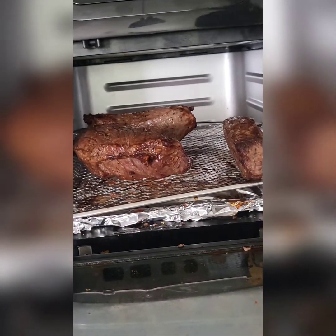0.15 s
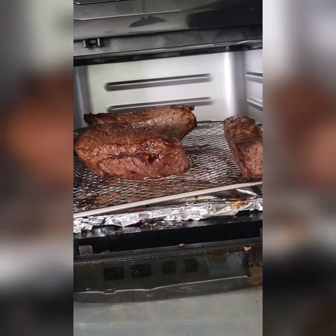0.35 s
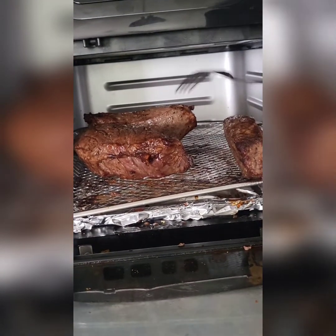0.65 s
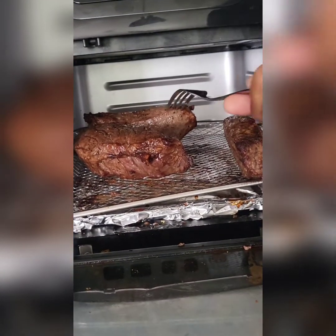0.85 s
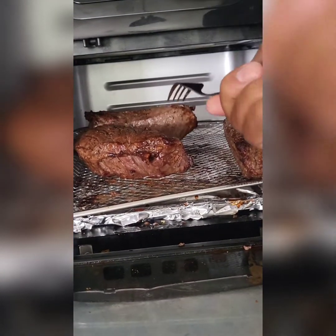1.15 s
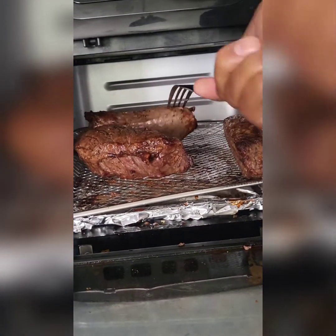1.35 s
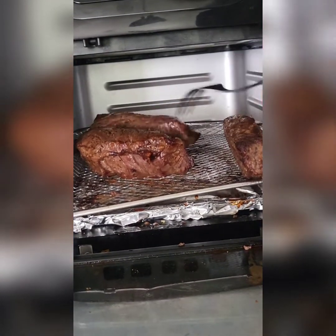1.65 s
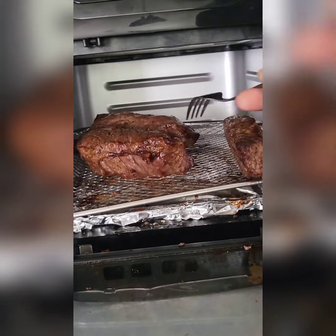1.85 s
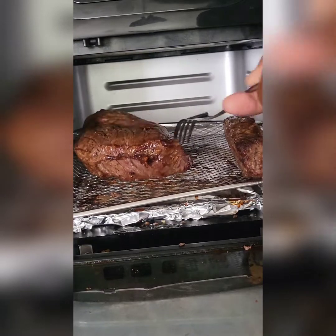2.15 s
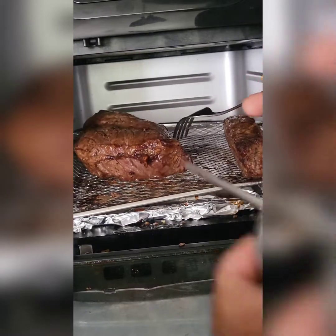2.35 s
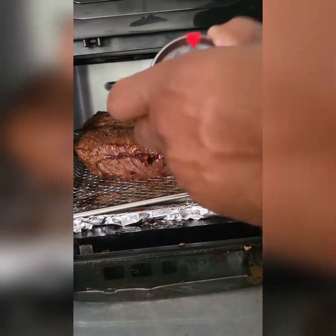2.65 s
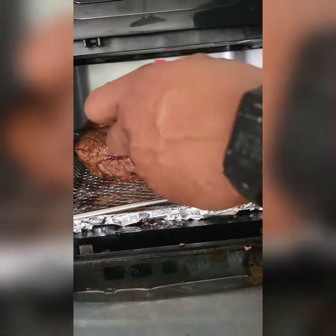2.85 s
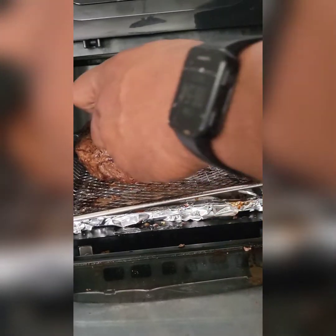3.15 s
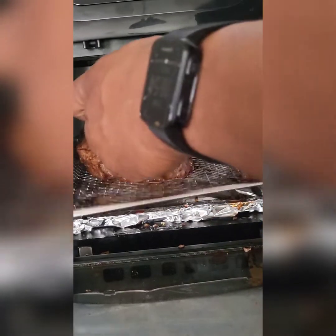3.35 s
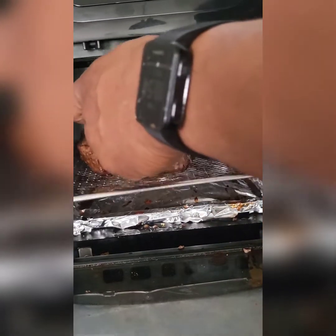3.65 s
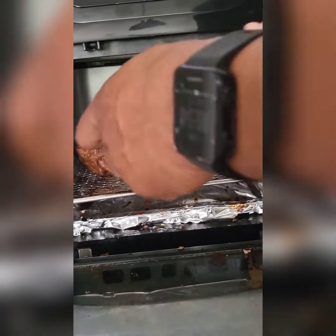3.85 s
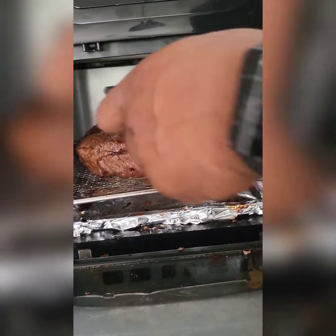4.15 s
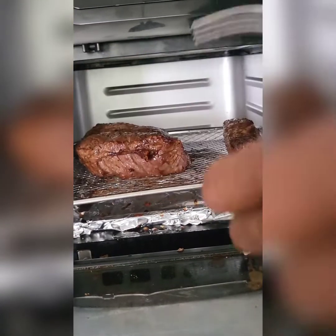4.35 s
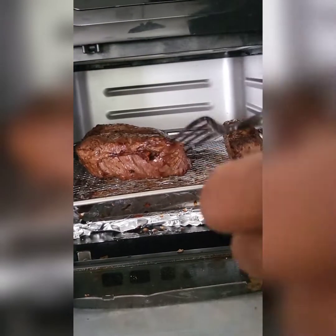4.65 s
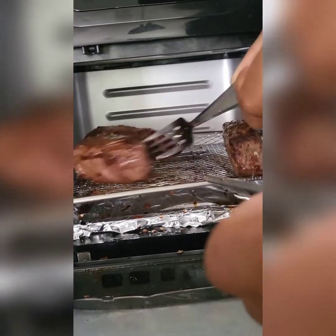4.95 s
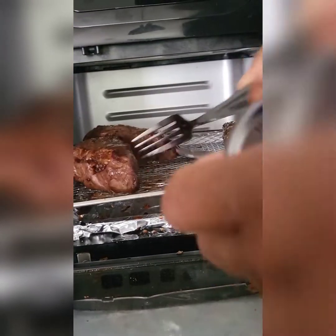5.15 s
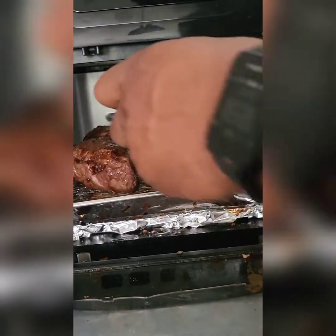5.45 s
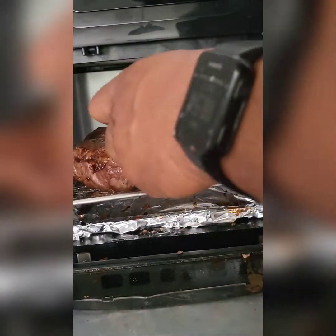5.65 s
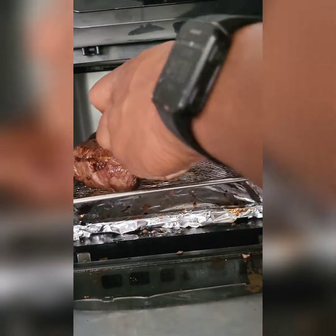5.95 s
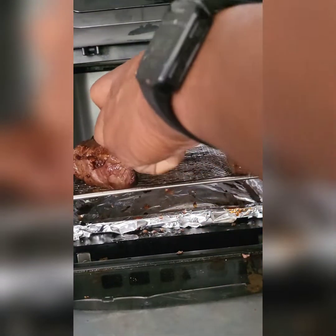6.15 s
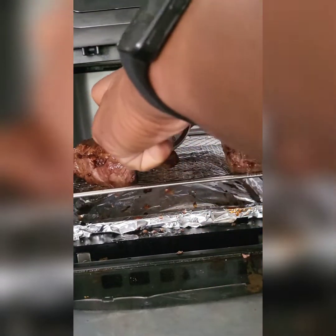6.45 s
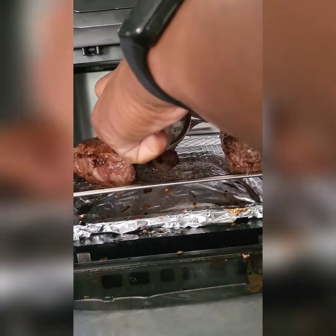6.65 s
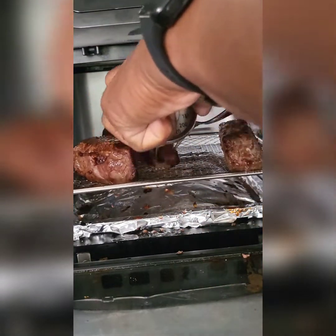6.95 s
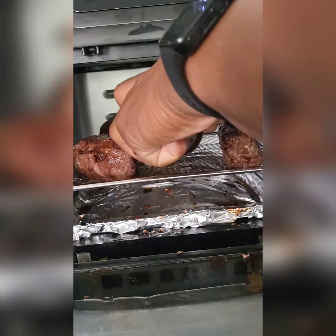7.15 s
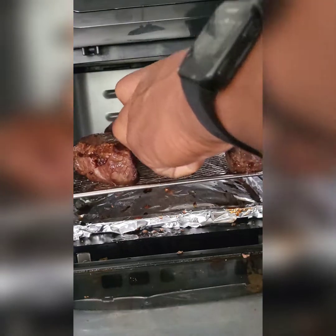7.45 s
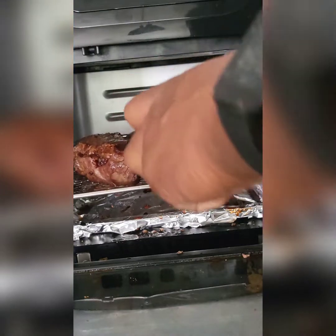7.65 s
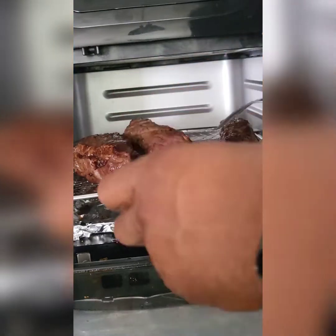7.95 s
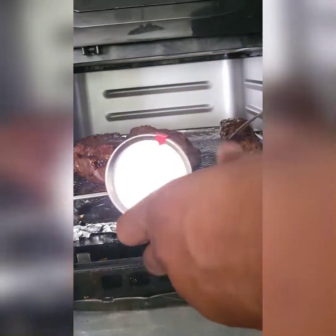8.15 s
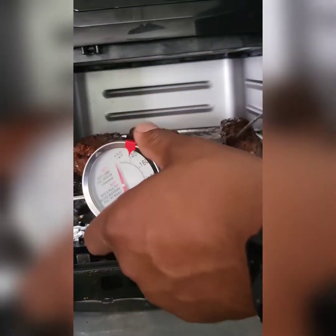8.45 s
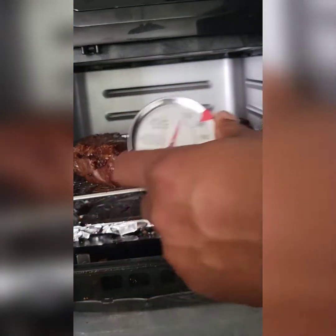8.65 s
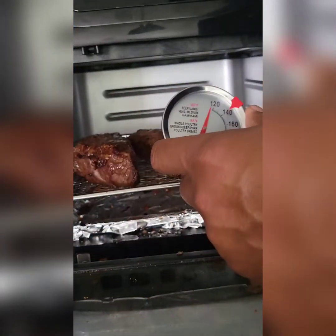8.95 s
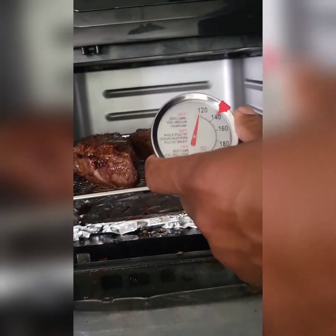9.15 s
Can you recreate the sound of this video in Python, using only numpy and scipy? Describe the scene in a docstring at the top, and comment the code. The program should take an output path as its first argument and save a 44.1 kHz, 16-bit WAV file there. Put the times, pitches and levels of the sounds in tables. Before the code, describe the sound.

A faint, wavering low hum and soft airy hiss run throughout, in a small kitchen heard by a close stereo phone microphone. From 0 to 1 s there are light rustles and a tiny tick. At 1.1 s a fork touches faintly; around 1.5-1.6 s the rack gives dull knocks, and at 2.1 s a short rattly bump and drag. Small ticks and a soft knock follow. At 3.2-3.5 s the rack clatters loudly on the tray, hollow thuds with cracks and a scrape. At 3.7-4.3 s come more knocks, piercing steel clinks and gritty, fading singing of tines. Near 5 s a cluster of rattly knocks and a tick. From 6.1 to 6.7 s, quieter knocks with chirping slips along wires. Muffled thumps fall near 7.1, 7.5 and 7.7 s, with a faint clink at 7.25 s; then barely audible squeaks and hum to about 9 s. Short boxy oven echo.

```python
"""A faint kitchen hum and a first rustle open the scene; then a rack knocks and drags on a foil-lined tray.
A steel fork turning meat clinks, and its tines sing as they rub the wires, in a small open oven.
Knocks, clinks and slips ring decaying modes; rubbing, grit and squeaks are shaped noise, and singing is
noise driven through resonances. The oven box adds a short echo; the kitchen is hum and a microphone
resonance over room air."""
import sys
import numpy as np
from scipy import signal
from scipy.fft import rfft, irfft, next_fast_len
from scipy.io import wavfile
from scipy.ndimage import uniform_filter1d, map_coordinates

SR = 44100
rng = np.random.default_rng(int(sys.argv[2]) if len(sys.argv) > 2 else 0)


def master(y):
    """Save y as 16-bit WAV."""
    cut = np.clip(np.atleast_2d(y).T, -1, 1)
    pcm = np.round(cut * 32767)  # scale
    wavfile.write(sys.argv[1], SR, pcm.astype(np.int16))


N = 409688  # length in samples

# Kitchen air and microphone hiss, spectrum shape: f/Hz, density/dB
ROOM_SPECTRUM = [(25, -19), (55, 2.5), (120, -3.5), (141, -15), (223, -10), (293, -16), (335, -9.5),
                 (1020, -25.5), (1610, -33.5), (3080, -39.5), (16000, -43.5)]
# Hum bands, the last being a microphone resonance in the hiss: f/Hz, width/Hz, level/dB
HUM_BANDS = [(56.95, 3.3, 11.5), (129.2, 16, 4), (343.4, 40, -6), (1871, 45, -23), (7570, 600, -34)]
# Left-right likeness of the kitchen: f/Hz, correlation
KITCHEN_LIKENESS = [(60, 0.93), (300, 0.87), (1000, 0.033), (4000, 0.026), (14000, 0.9)]
# Left-right balance of the kitchen: f/Hz, left over right/dB
KITCHEN_LEAN = [(60, 3), (1000, 6), (4000, 2.5), (15000, -4.5)]
# Left-right balance of the metal: f/Hz, left over right/dB
METAL_TILT = [(100, 1), (600, 4), (2500, 5), (5000, 3.5), (10000, -4), (14000, 1.5)]
# Phase between the ports for the metal: f/Hz, left port's lead/rad
METAL_TWIST = [(200, .1), (1000, .7), (2800, 1.4), (5600, 1.6), (10000, 1.2), (14000, .8)]
# Echo of the oven box: f/Hz, t60/s
OVEN_DECAY = [(200, 0.017), (2000, 0.051), (12000, 0.013)]
# Tray and oven box modes, the first four being the soft thud: f/Hz, level/dB, t60/s
TRAY_MODES = [(143, -0.5, 0.14), (209.2, 2, 0.088), (244.4, 2, 0.11), (339, 1, 0.095), (435, -4.5, 0.042),
              (587, -6, 0.06), (698.6, -4, 0.062), (805, -7.5, 0.026), (985, -13.5, 0.022),
              (1205, -15.5, 0.02), (1812, -19.5, 0.013)]
# Fork modes: f/Hz, level/dB, t60/s before extra damping
FORK_MODES = [(1927, -11, .8), (2470, -8, .2), (2570, -6, 1.0), (2900, -1, .11), (3165, -5, .7),
              (3548, 0, .2), (3741, 0, .25), (4290, -9, .3), (4953, 0, .2), (7390, -4, .1), (7876, -6, .15),
              (8960, -7, .2), (9880, 3, .25), (12920, 3, .1), (14300, 3, .1)]
# Rubbing hiss, spectrum shape: f/Hz, density/dB
HISS_SPECTRUM = [(500, -25.5), (1000, -10), (3600, -5), (6400, -10.5), (7700, -1.5), (9500, -11),
                 (16000, -13.5)]
# Crack of a hard contact, spectrum shape: f/Hz, density/dB
CRACK_SPECTRUM = [(700, -48.5), (1500, -1.5), (3400, -8), (7600, -5.5), (13000, -12.5), (16000, -11)]
# Steel on steel, spectrum shape: f/Hz, density/dB
TICK_SPECTRUM = [(1500, -29.5), (3500, -8), (8100, -1.5), (9100, -7), (10300, 3.5), (11500, -15.5),
                 (13000, -4), (17000, -6)]
# Faint hissy squeaks: start t/s, length t/s, f/Hz, level/dB
SQUEAKS = [(6.94, .09, 4360, -82), (7.427, 0.098, 5080, -79.5), (8.067, 0.041, 3920, -78.5),
           (8.069, 0.097, 2820, -83), (8.448, 0.072, 7500, -76), (8.638, 0.055, 7400, -76.5),
           (8.911, 0.16, 1630, -81.5)]
# Rustling and dragging strokes: strongest t/s, dying away t/s, hiss level/dB, tray rumble level/dB
STROKES = [(0.039, 0.22, -61, -57.5), (0.316, 0.21, -72, -82), (0.411, 0.28, -66, -62),
           (0.608, 0.19, -62.5, -68.5), (0.843, 0.055, -69.5, -85), (1.111, 0.066, -73.5, -50.5),
           (1.482, 0.25, -69.5, -51), (1.578, 0.3, -75, -52), (2.125, 0.097, -67, -42.5),
           (2.242, 0.53, -79, -62), (3.417, 0.18, -51, -32), (3.529, 0.19, -81, -51),
           (3.793, 0.32, -54.5, -48.5), (4.149, 0.31, -66, -66), (4.693, 0.23, -78, -60.5),
           (4.928, 0.037, -87, -50), (4.983, 0.15, -59.5, -41.5), (5.14, 0.33, -78.5, -61),
           (6.11, 0.38, -82.5, -61.5), (6.39, 0.49, -77.5, -64.5), (6.754, 0.081, -78, -57.5),
           (7.073, 0.097, -72, -55), (7.599, 0.05, -73, -70), (7.689, 0.13, -74, -47),
           (8.114, 0.19, -84, -62.5)]
# Tines skipping over wires: start t/s, length t/s, first level of low mode and grit/dB, of upper two modes/dB
SINGING = [(1.106, .08, -73, -80), (3.793, .13, -62, -44), (3.93, .19, -63, -57), (4.13, .24, -69, -51),
           (6.078, .145, -71, -75), (6.225, .125, -72, -76), (6.351, .095, -69, -76),
           (6.447, .18, -66, -75), (6.94, .13, -75, -81)]
# Singing under the hand, three tine modes then two grit bands:
# f/Hz, width before the double pass/Hz, level/dB, drive between slips/0-1
TINE_BANDS = [(3530, 220, 0, .22), (4930, 260, -10, .3), (9890, 160, -11, .5), (10200, 2500, -3, .35),
              (15300, 2000, -7, .4)]
# Clearest single slips of a tine: t/s, level/dB
SLIPS = [(1.111, -60), (3.788, -38), (3.926, -47), (4.052, -53.5), (4.285, -56.5), (6.0786, -52),
         (6.1217, -63.5), (6.1565, -60), (6.1815, -60), (6.2032, -61), (6.227, -51), (6.2853, -64),
         (6.3527, -53), (6.415, -66), (6.4456, -51), (6.4952, -59), (6.5183, -59), (6.5697, -59.5),
         (6.671, -66), (6.94, -74), (6.959, -60.5), (6.995, -66)]
# Fork clinks: t/s, tick level/dB, ring level/dB, best excited f/Hz,
# fall-off away from it/dB per octave, extra damping by hand or meat/dB per s
CLINKS = [(0.826, -62, -95, 9000, 11, 200), (1.103, -62, -58, 2470, 150, 300),
          (1.737, -61.5, -63, 2620, 60, 1200), (1.843, -68.5, -65, 2600, 58, 1200),
          (2.277, -57.5, -83, 4900, 17, 200), (2.459, -60.5, -90, 4300, 10, 200),
          (3.207, -58, -95, 9000, 11, 200), (3.222, -57, -95, 9000, 11, 200),
          (5.0215, -38.5, -77, 3900, 6, 200), (3.797, -37, -44, 3300, 4, 25),
          (3.9265, -23, -47, 2570, 30, 20), (4.0233, -27, -46, 3500, 60, 300),
          (4.1485, -62, -45, 4950, 90, 100), (4.195, -72, -54, 4290, 90, 50),
          (4.24, -72, -57, 3740, 120, 60), (7.243, -66, -51, 2900, 300, 350),
          (7.249, -55, -60, 7600, 60, 600)]
# Rack on tray: t/s, thud level/dB, hardness (crack against thud)/dB, best excited f of the thud/Hz
KNOCKS = [(1.102, -54.5, -20, 345), (1.508, -39, -3.5, 246), (1.568, -31, -8, 360),
          (1.598, -27, -17.5, 237), (2.124, -51, 13.5, 345), (2.141, -37, -3, 342), (2.896, -43, -8, 145),
          (3.204, -34.5, -36, 287), (3.27, -38, -37.5, 345), (3.368, -27.5, -23, 292),
          (3.394, -20.5, -14, 207), (3.411, -17.5, -6, 343), (3.426, -24, -14.5, 247),
          (3.443, -26, -5.5, 150), (3.487, -21, -5, 183.7), (3.669, -35.5, -24, 297),
          (3.687, -28, -16.5, 219), (3.761, -40, -3, 256), (3.788, -36, 3.5, 189), (4.941, -35, 1, 235),
          (4.959, -35.5, -1, 169), (4.975, -33.5, -9.5, 224), (5.014, -31, -12.5, 214),
          (6.081, -40.5, -16.5, 195), (6.151, -32, -17, 236), (6.443, -47.5, -20.5, 232),
          (6.473, -38.5, -12.5, 243), (6.729, -43, -59, 163), (6.76, -45, -21.5, 236),
          (7.102, -40, -67, 154), (7.41, -45, -33, 215.5), (7.471, -28.5, -37, 224),
          (7.695, -30.5, -31, 220), (8.575, -58, -5.5, 340)]

KITCHEN_DB = -62.5  # scales the hum and the air together
SQUEAK_Q = 7.6  # pitch over bandwidth
RISE_S, RISE_SHARE = 0.069, 0.75  # longest swell of a stroke; its limit as a share of the dying away
FADE_DB_PER_S = 65  # fade of each singing chain
HELD_T60_S, SLIP_GRIT_DB = 0.041, -13  # ring of a tine under the hand; puff of grit against the chirp
THUD_DB_PER_OCTAVE = 12  # fall-off of the thud modes away from the best excited pitch
CLANK_DB, CLANK_GROWS = 19.5, 0.092  # drive of upper tray modes over the thud; dB gained per dB of hardness
DULL_HZ, DULL_DB_PER_OCTAVE = 14000, 8  # knock's noise cutoff at 0 dB hardness; dB of hardness per octave
TOP_HZ = 16000  # band limit of the phone


def amp(db):
    """Decibels to amplitude."""
    return 10 ** (np.asarray(db) / 20)


def unit(x):
    """Scale to an RMS of one."""
    return x / np.sqrt(np.mean(x ** 2) + 1e-20)


def along(points, hz):
    """Interpolate (f/Hz, value) points on a log frequency axis."""
    f, v = np.transpose(points)
    return np.interp(np.log(hz + 1), np.log(f + 1), v)


def wobble(rate):
    """A smooth random curve, rate knots a second."""
    knots = rng.standard_normal(int(N * rate / SR) + 4)
    return map_coordinates(knots, [np.arange(N) * rate / SR])


def filtered(x, response):
    """Shape x with a complex response of frequency."""
    m = next_fast_len(N + SR // 2)
    return irfft(rfft(x, m) * response(np.fft.rfftfreq(m, 1 / SR)), m)[..., :N]


def coloured(x, spectrum):
    """Give x a spectrum, as loud as before for white input."""
    grid_hz = np.linspace(0, SR / 2, 2000)
    mean = np.sqrt(np.mean(amp(along(spectrum, grid_hz)) ** 2))
    return filtered(x, lambda hz: amp(along(spectrum, hz)) / mean)


def resonant(modes):
    """Response of (f/Hz, width/Hz, level/dB) resonances, summed with alternating sign."""
    def response(f):
        total = 0
        for k, (centre, width, db) in enumerate(modes):
            band = 1j * f * width / (centre * centre - f * f + 1j * f * width)
            total = total + (-1) ** k * amp(db) * band
        return total
    return response


def widths(modes, damping):
    """Bandwidths of ringing modes while something leans on them."""
    return [(hz, damping * np.log(1000) / np.pi / t60, db) for hz, db, t60 in modes]


def ring(modes, t, scatter_db, detune, bias_db=0):
    """One blow: every mode at a new strength and, as the load shifts, a slightly new pitch."""
    hz, db, t60 = np.transpose(modes)[..., None]
    strength, shift = rng.standard_normal((2, len(modes), 1))
    level_db = db + bias_db + scatter_db * strength - 60 * t / t60
    tones = np.sin(2 * np.pi * hz * (1 + detune * shift) * t)
    return (amp(level_db) * tones).sum(0)


def add(track, s, sound):
    """Mix a sound in at s seconds."""
    part = track[..., round(s * SR):][..., :sound.shape[-1]]
    part += sound[..., :part.shape[-1]]


def scattered(size):
    """Noise from contacts spread along the rack: only partly the same at both ports."""
    shared = .8 * rng.standard_normal(size)
    return shared + .6 * rng.standard_normal((2, size))


def patchy(depth_db):
    """Two noises whose bands swell and sink over time, in the same pattern on both."""
    z = signal.stft(rng.standard_normal((2, N)), nperseg=512)[2]
    field = uniform_filter1d(rng.standard_normal(z.shape[1:]), size=5, axis=0)
    field = uniform_filter1d(field, size=30, axis=1)
    return signal.istft(z * amp(depth_db * unit(field)), nperseg=512)[1][:, :N]


def kitchen():
    """Wavering hum and microphone resonance over room air, most alike at both ports in bass and top treble."""
    hum = unit(filtered(patchy(depth_db=2.5), lambda hz: resonant(HUM_BANDS)(hz) * hz / (hz + 30)))
    air = unit(coloured(rng.standard_normal((2, N)), ROOM_SPECTRUM)) * amp(1.9 * wobble(5.4))

    def mid_side(hz):
        turn = np.arccos(np.clip(along(KITCHEN_LIKENESS, hz), -1, 1)) / 2
        return np.array([np.cos(turn), np.sin(turn)])

    def lean(hz):
        return np.sqrt(amp(along(KITCHEN_LEAN, hz) * np.array([[1], [-1]])))

    mid, side = filtered(amp(KITCHEN_DB) * (hum + air), mid_side)
    return filtered(np.array([mid + side, mid - side]), lean)


def oven(x):
    """Each frequency of the box's echo dies at its own speed."""
    hz, t, z = signal.stft(rng.standard_normal((2, SR // 3)), SR, nperseg=256)
    decay = amp(-60 * t / along(OVEN_DECAY, hz)[:, None])
    tail = signal.istft(z * decay, SR, nperseg=256)[1]
    delayed = np.pad(x, ((0, 0), (100, 0)))  # samples
    return signal.fftconvolve(delayed, tail / np.linalg.norm(tail[0]), axes=1)[:, :N]


def ports(x):
    """The two microphone ports hear the metal with their own level and phase."""
    def pair(hz):
        half = np.sqrt(amp(along(METAL_TILT, hz))) * np.exp(.5j * along(METAL_TWIST, hz))
        return np.array([half, 1 / half])
    return filtered(x, pair)


def squeaks():
    """Short swells of narrow hiss."""
    out = np.zeros((2, N))
    for s, length, hz, db in SQUEAKS:
        edges = [hz * (1 - .5 / SQUEAK_Q), hz * (1 + .5 / SQUEAK_Q)]
        band = signal.butter(2, edges, 'bandpass', fs=SR)
        hiss = unit(signal.lfilter(*band, scattered(size=SR // 5)))[:, :round(length * SR)]
        add(out, s, amp(db) * np.sqrt(np.hanning(hiss.shape[1])) * hiss)
    return out


def strokes():
    """Rubbing swells as hiss and as a lumpy rumble in the tray."""
    levels = np.zeros((2, N))
    for top, fall, hiss_db, rumble_db in STROKES:
        rise = min(RISE_S, RISE_SHARE * fall, top)
        t = np.arange(round((rise + fall) * SR)) / SR
        phase = np.interp(t, [0, rise, rise + fall], [0, np.pi / 2, np.pi])
        swell = np.abs(np.sin(phase)) ** 1.89
        # squared: the tray moves only at the height of a stroke
        add(levels, top - rise, np.array([amp(hiss_db) * swell, amp(rumble_db) * swell ** 2]))
    rub = coloured(amp(2.3 * wobble(67)) * scattered(size=N), HISS_SPECTRUM)
    lumps = amp(4 * wobble(80)) * rng.standard_normal(N)
    tray = resonant(widths(TRAY_MODES, damping=1.6))
    drag = filtered(lumps, lambda hz: tray(hz) / (1 + hz / 1800))
    return levels[0] * unit(rub) + levels[1] * unit(drag)


def singing():
    """Tines slip over wires in an uneven, fading chain of chirps and grit, and sing on between slips."""
    count = np.cumsum(36 * amp(6 * wobble(25)) / SR)  # slips so far, around 36 a second
    size, grit = amp(3 * wobble(30)), rng.standard_normal(N)
    slips, drives, out = np.zeros(N), np.zeros((2, N)), np.zeros(N)
    for start, length, *db in SINGING:
        done = count[round(start * SR):][:round(length * SR)]
        add(slips, start, np.exp(-((done - done[0]) % 1) / .15))
        fade_db = FADE_DB_PER_S * np.arange(len(done)) / SR
        add(drives, start, amp(np.array(db)[:, None] - fade_db))
    # low mode and grit share the first drive, the upper two modes the second
    for drive, (hz, width, db, between) in zip(drives[[0, 1, 1, 0, 0]], TINE_BANDS):
        push = np.array([drive * (slips * size + between), np.ones(N)]) * grit
        heard, full = filtered(push, lambda f: resonant([(hz, width, 0)])(f) ** 2)
        out += amp(db) * heard / np.std(full)  # level set against steady, full drive
    return out


def slipping():
    """One slip: a short, rough chirp of the held tine and a puff of grit."""
    out, puffs, t = np.zeros((2, N)), np.zeros((2, N)), np.arange(SR // 10) / SR
    held = [(hz, db, HELD_T60_S) for hz, _, db, _ in TINE_BANDS[:3]]
    for s, db in SLIPS:
        onset = 1 - np.exp(-t / 0.00029)
        chirp = ring(held, t, scatter_db=0.0, detune=0.0052)
        rough = 1 + 0.27 * uniform_filter1d(rng.standard_normal(len(t)) * 8, size=64)
        add(out, s, amp(db) * onset * chirp * rough)
        add(puffs, s, amp(db + SLIP_GRIT_DB - 60 * t / 0.038) * scattered(size=len(t)))
    return out + coloured(puffs, TICK_SPECTRUM)


def clinks():
    """A bright tick, then the fork's modes, strongest near the pitch that the struck spot favours."""
    rings, ticks, t = np.zeros(N), np.zeros((2, N)), np.arange(SR // 2) / SR
    burst = amp(-60 * t / 0.018) + 0.16 * amp(-60 * t / 0.18)
    for s, db, ring_db, spot_hz, slope_db, damp_db in CLINKS:
        away = np.abs(np.log2(np.transpose(FORK_MODES)[0][:, None] / spot_hz))  # octaves
        modes = ring(FORK_MODES, t, scatter_db=2.5, detune=0.0011, bias_db=-abs(slope_db) * away)
        onset = 1 - np.exp(-t / .002)
        add(rings, s, amp(ring_db - abs(damp_db) * t) * onset * modes)
        add(ticks, s, amp(db) * burst * scattered(size=len(t)))
    flutter = amp(3 * wobble(45))  # the hand's grip on the fork is never still
    return rings * flutter, coloured(ticks, TICK_SPECTRUM)


def knocks():
    """Each knock thuds in the tray; harder ones rattle its upper modes and crack."""
    body, clanks, cracks = np.zeros(N), np.zeros((2, N)), np.zeros((2, N))
    t = np.arange(SR // 4) / SR
    scuff = (1 - np.exp(-t / 0.0012)) * (amp(-60 * t / 0.052) + 0.032 * amp(-60 * t / 0.5))
    chatter = (1 - np.exp(-t / 0.00032)) * amp(-60 * t / 0.072)  # many wires land within a few ms
    thud_modes = TRAY_MODES[:4]
    for s, db, hard_db, spot_hz in KNOCKS:
        away = np.abs(np.log2(np.transpose(thud_modes)[0][:, None] / spot_hz))  # octaves
        thud = ring(thud_modes, t, scatter_db=3.0, detune=0.033, bias_db=-THUD_DB_PER_OCTAVE * away)
        add(body, s, amp(db) * (1 - np.exp(-t / 0.0023)) * thud)
        top_hz = np.clip(DULL_HZ * 2 ** (hard_db / DULL_DB_PER_OCTAVE), 500, SR / 2 - 500)
        dull = signal.butter(1, top_hz, fs=SR)  # softer knocks are duller
        rattle = chatter * signal.lfilter(*dull, scattered(size=len(t)))
        add(clanks, s, amp(db + CLANK_DB + CLANK_GROWS * hard_db) * rattle)
        crack = scuff * signal.lfilter(*dull, scattered(size=len(t)))
        add(cracks, s, amp(db + hard_db) * crack)
    upper_tray = resonant(widths(TRAY_MODES[4:], damping=1.48))
    return body + filtered(clanks, upper_tray) + coloured(cracks, CRACK_SPECTRUM)


def scene():
    """Metal with its oven echo, the fork's ring without echo, and the kitchen underneath."""
    rings, ticks = clinks()
    metal = ports(knocks() + ticks + strokes() + singing() + slipping() + squeaks())
    # the box is too small to scatter the bass
    echo = filtered(oven(metal), lambda hz: (hz / (hz + 500)) ** 2)
    return metal + amp(-3.0) * echo + ports(rings) + kitchen()


def record(dry):
    """The phone keeps only a weak strip above its band limit, and nothing from 16840 Hz up."""
    return filtered(dry, lambda hz: np.where(hz < TOP_HZ, 1, amp(-22) * (hz < 16840)))


dry = scene()
out = record(dry)
master(out)
```